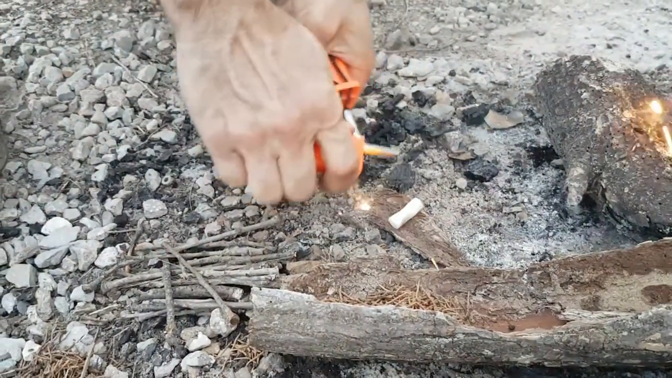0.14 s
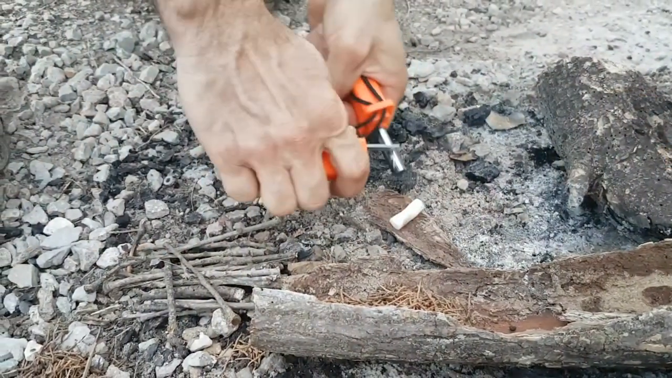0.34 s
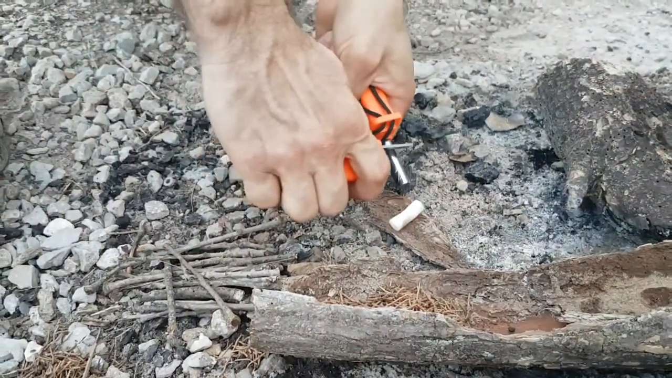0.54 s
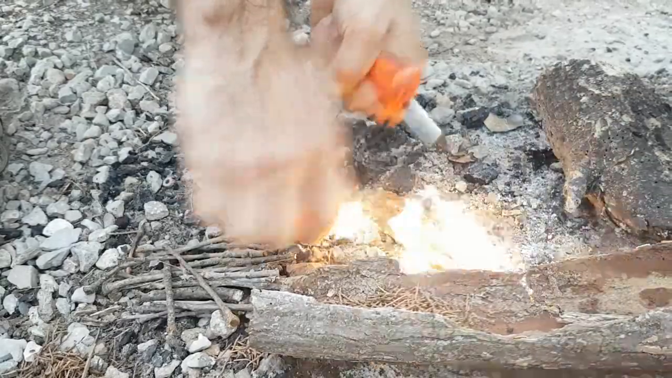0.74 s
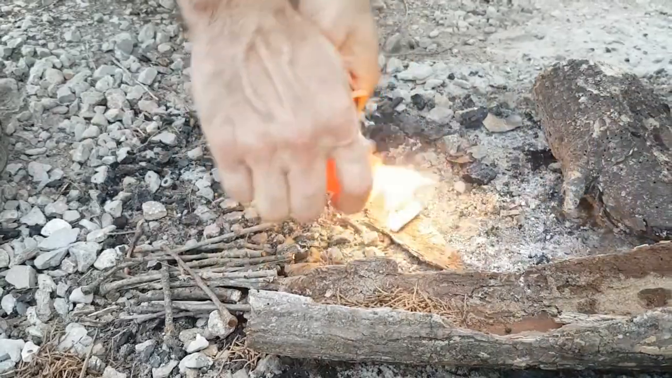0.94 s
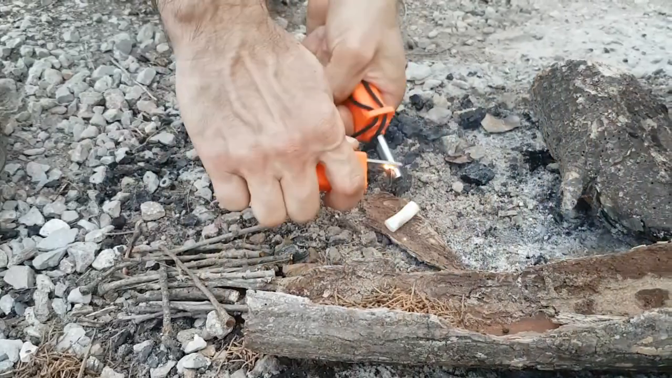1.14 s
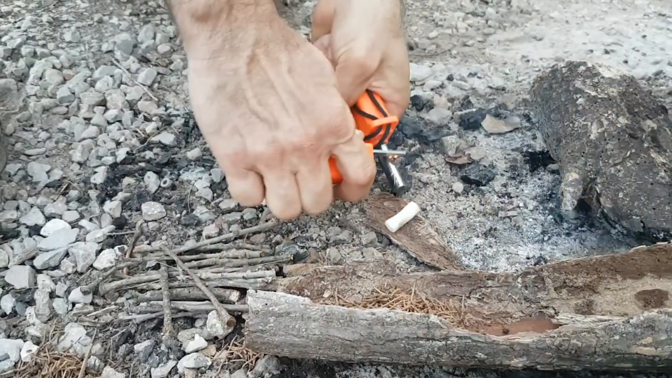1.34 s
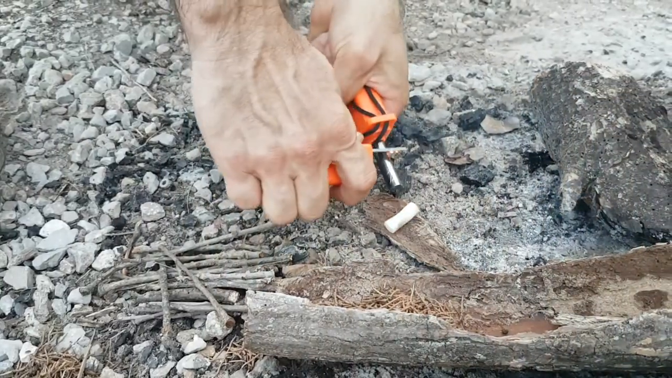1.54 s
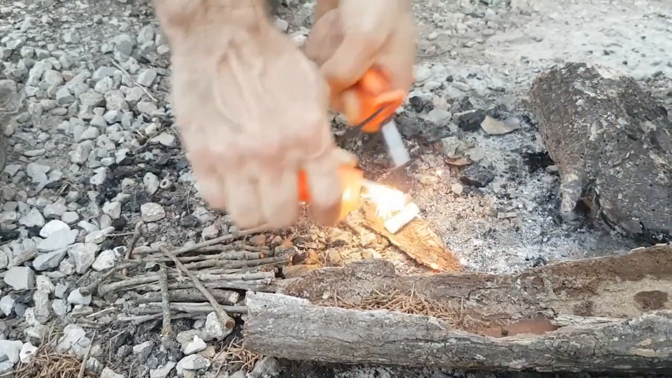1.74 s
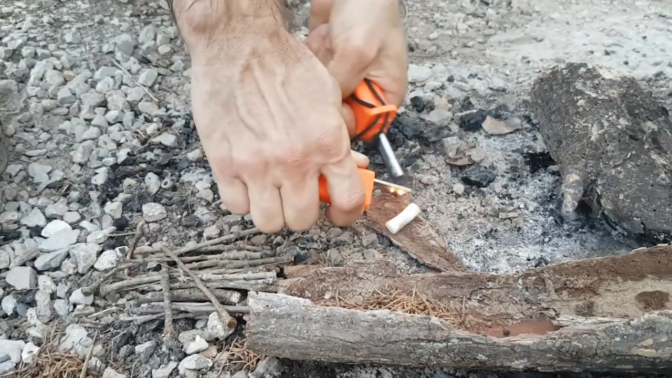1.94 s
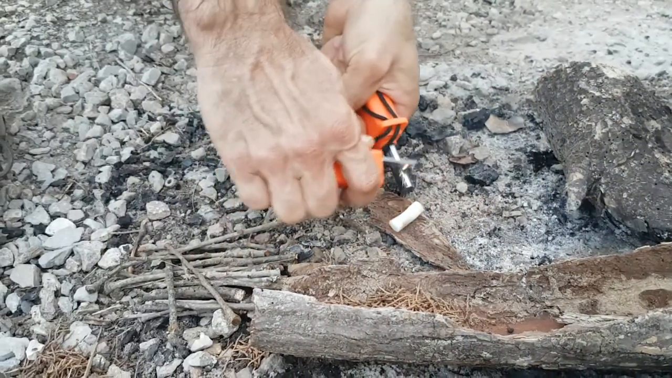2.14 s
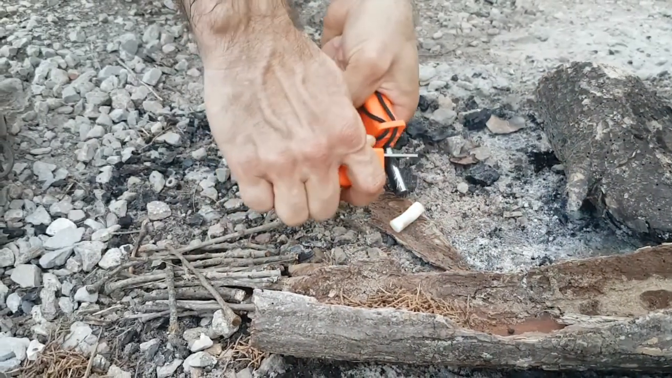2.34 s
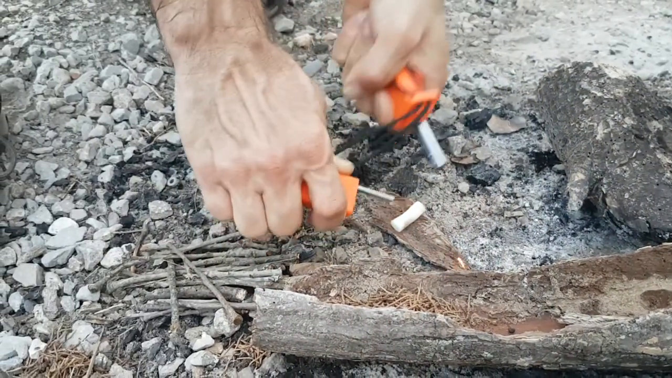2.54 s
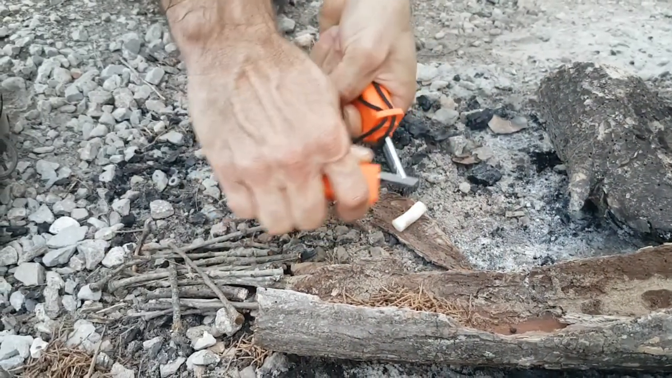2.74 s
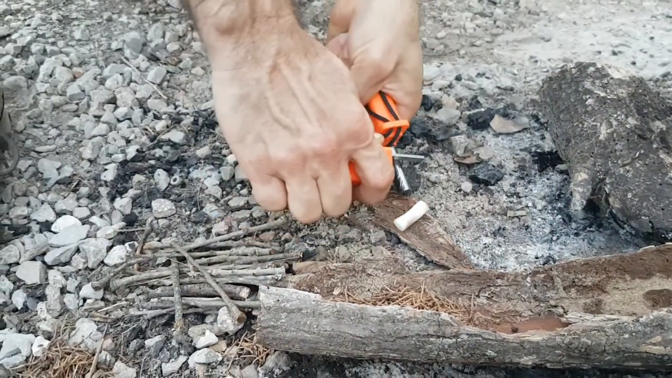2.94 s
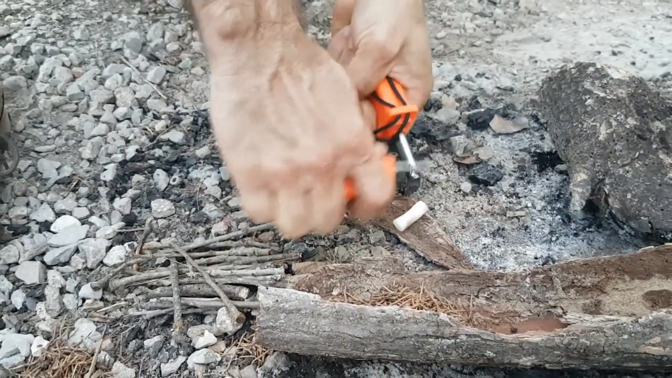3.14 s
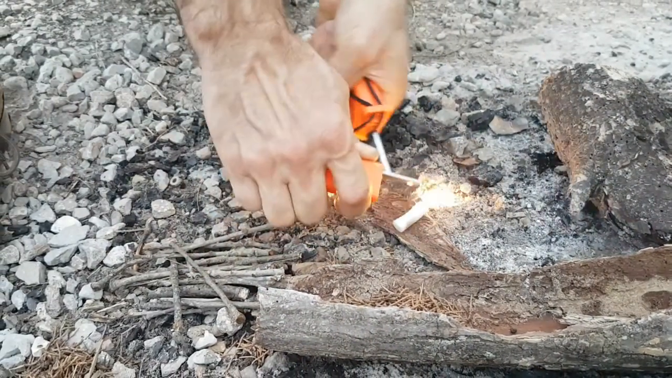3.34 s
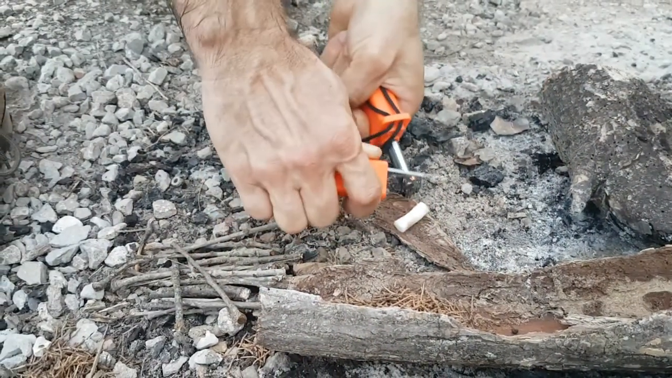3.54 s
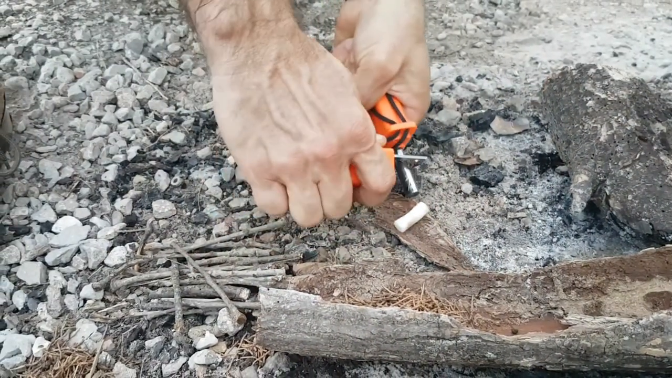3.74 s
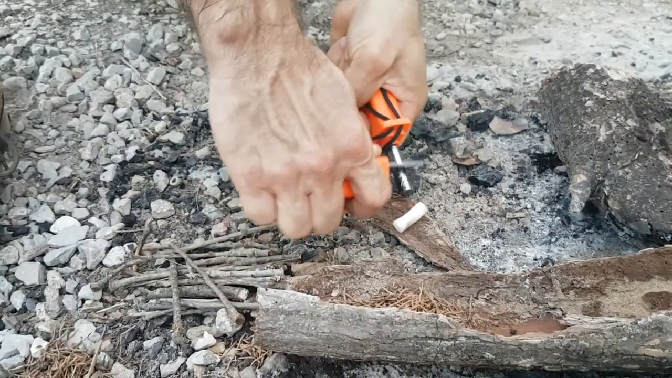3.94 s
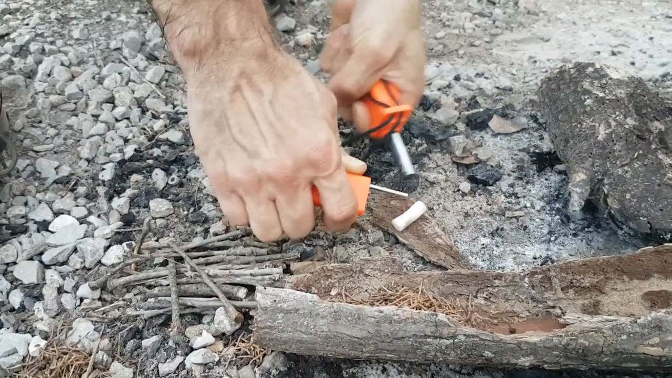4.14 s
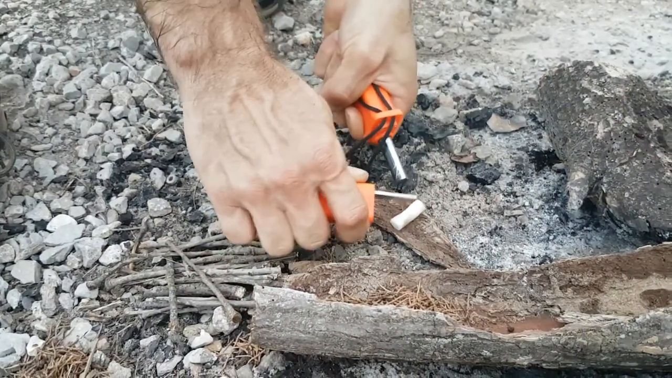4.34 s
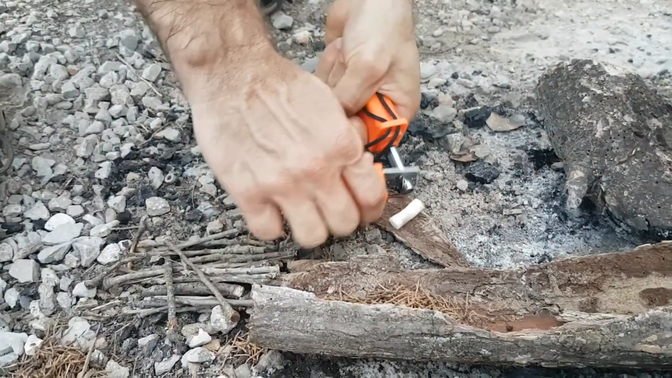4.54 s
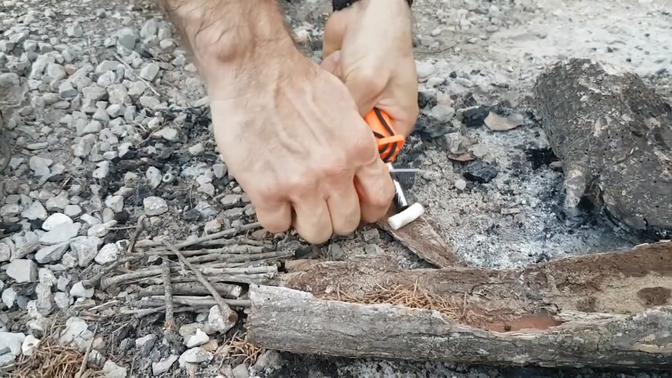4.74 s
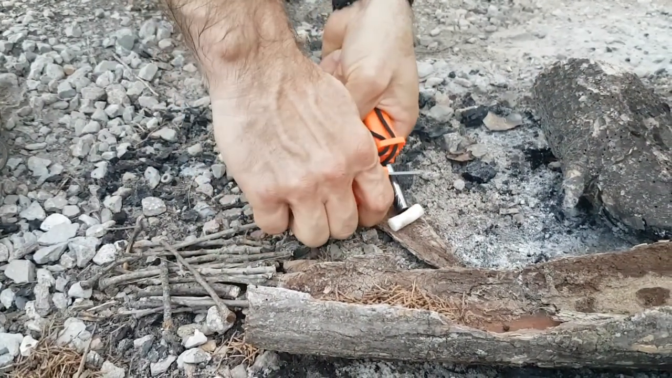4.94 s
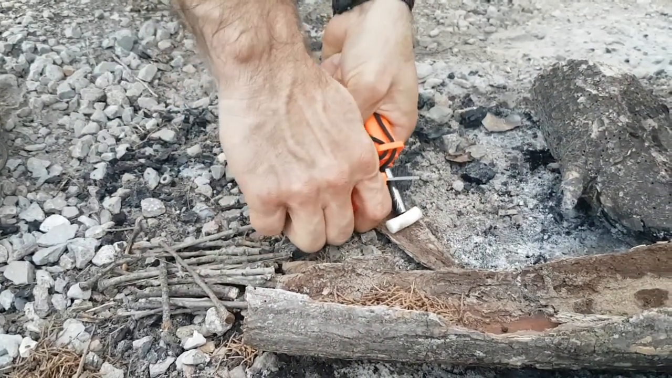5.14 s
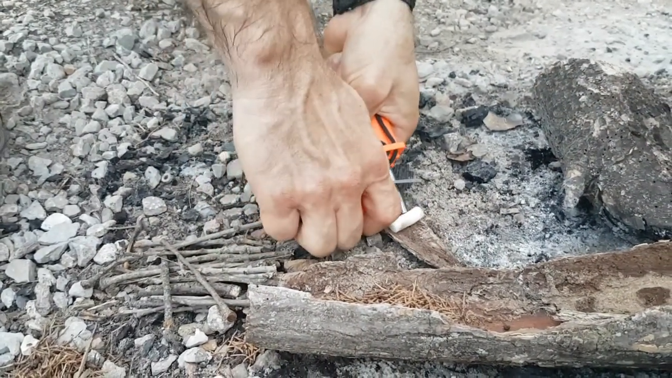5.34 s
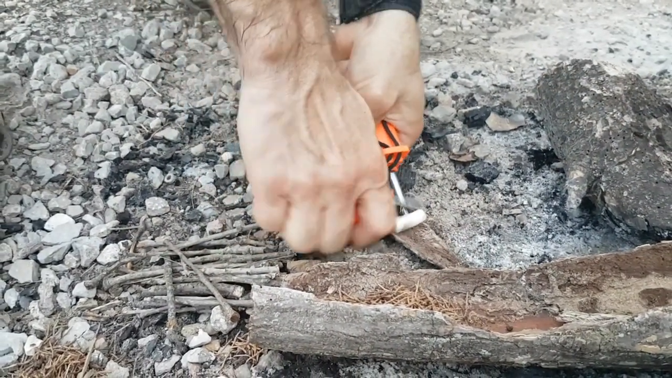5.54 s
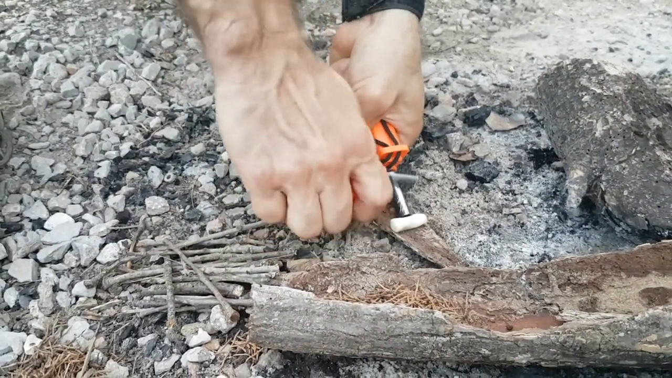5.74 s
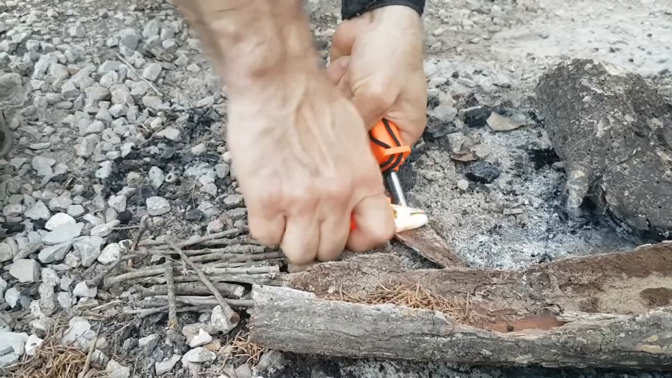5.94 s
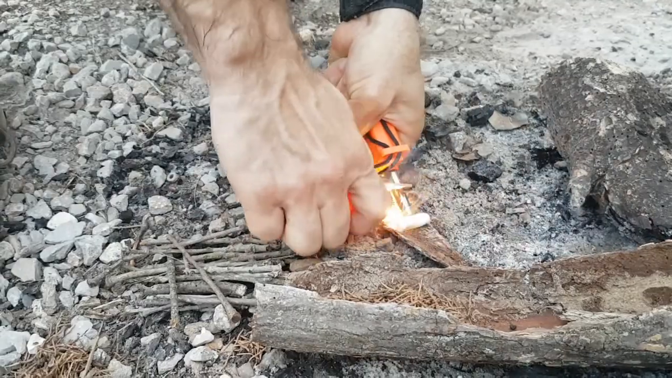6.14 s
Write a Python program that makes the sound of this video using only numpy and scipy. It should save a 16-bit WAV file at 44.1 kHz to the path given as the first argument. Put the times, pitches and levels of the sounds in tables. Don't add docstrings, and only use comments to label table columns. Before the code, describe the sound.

The tail of a spark burst crackles at 0 s with stirred grit, then crisp steel ticks at 0.3 and 0.45 s. Five fast scrapes follow at about 0.75, 1.6, 2.4, 3.2 and 4.0 s, each under a tenth of a second: a stick-slip metallic chatter ending in a hard bright snap, then fizzing shavings and rumbling grit. Sparks pop around 1.0 s; a very loud tick lands at 2.9 s. Faint rubs and touches fill 3.4-4.6 s. At 5.45-5.6 s ticks lead into a duller, pressed stuttering scrape with a snap and pop; another tick at 5.8, a weaker shove at 5.95, a loud clack at 6.16 s. Throughout, a distant engine idles low and pulsing, its upper tones receding, cicadas swell about once a second over a fast high throb, and a cricket holds steady. Thin whistles pass near 4.2 and 5.3 s. Close, dry, open air.

```python
import sys
import numpy as np
from scipy import signal
from scipy.fft import rfft, irfft
from scipy.io import wavfile

SR = 44100
rng = np.random.default_rng(int(sys.argv[2]) if len(sys.argv) > 2 else 0)


def inscribe(sig):
    pcm = np.round(np.clip(np.atleast_2d(sig).T, -1, 1) * 32767)
    wavfile.write(sys.argv[1], SR, pcm.astype(np.int16))


def magnitude_from_level(level_db):
    exponent = np.asarray(level_db, float) / 20
    return 10 ** exponent


N = 277389


def rms_one(x):
    return x / np.sqrt(np.mean(x ** 2) + 1e-20)


def in_time(rows):
    s, value = np.transpose(rows)
    return np.interp(np.arange(N) / SR, s, value)


def at_hz(points, hz):
    point_hz, value = np.transpose(points)
    return np.interp(np.log(hz), np.log(point_hz), value)


def drift(rate_hz):
    r = np.exp(-80 * np.pi * rate_hz / SR)
    slow = signal.lfilter([1], [1, -2 * r, r * r], rng.standard_normal(N // 40 + 2002))[2000:]
    return np.interp(np.arange(N) / 40, np.arange(len(slow)), rms_one(slow))


def peak(x, hz, width_hz):
    r = np.exp(-np.pi * width_hz / SR)
    feedback = [1, -2 * r * np.cos(2 * np.pi * hz / SR), r * r]
    return signal.lfilter(np.array([1, 0, -1]) * (1 - r * r) / 2, feedback, x)


def narrow(x, hz, width_hz):
    return rms_one(peak(peak(x, hz, width_hz), hz, width_hz))


def body(x, modes, spread_db=0, steep=False):
    out = 0
    for k, (hz, width_hz, db) in enumerate(modes):
        gain = (-1) ** k * magnitude_from_level(db + spread_db * rng.normal())
        if steep:
            ring = peak(peak(x, hz, 1.5 * width_hz), hz, 1.5 * width_hz)
        else:
            ring = peak(x, hz, width_hz)
        out = out + gain * ring
    return out


def coloured(x, spectrum):
    size = N + 499
    hz = np.maximum(np.fft.rfftfreq(size, 1 / SR), 1)
    return rms_one(irfft(rfft(x, size) * magnitude_from_level(at_hz(spectrum, hz)), size)[..., :N])


def grains(per_s, spread_db, hiss):
    sizes = magnitude_from_level(spread_db * np.minimum(rng.exponential(1, N), 4)) * rng.choice([-1, 1], N)
    return rms_one(sizes * (rng.random(N) < per_s / SR)) + hiss * rng.standard_normal(N)


def port_noise(common):
    return rng.standard_normal((2, N)) + common * rng.standard_normal(N)


def two_ports(x, other, pan_db, own=.55, lag=1):
    own = np.clip(own, 0, .7)
    shared = np.sqrt(1 - own ** 2)
    left = shared * x + own * other
    right = shared * np.roll(x, lag) - own * other
    return np.array([left * magnitude_from_level(pan_db / 2), right * magnitude_from_level(-pan_db / 2)])


def add(out, s, level_db, parts, pan_db):
    hit = sum(magnitude_from_level(db) * two_ports(*(p / np.abs(p[0]).max()), share * pan_db, own=0.35)
              for db, p, share in parts)
    i = round(s * SR)
    out[:, i:i + hit.shape[1]] += magnitude_from_level(level_db) * hit


def loudest(shapes):
    t = np.arange(N) / SR
    curves = [np.interp(t, np.maximum.accumulate(s), db, left=-120, right=-120) for s, db in shapes]
    return np.max(curves, axis=0)


def swell(s, rise, hold, fall, db):
    return [s - 2 * rise, s, s + hold, s + hold + 2 * fall], [db - 40, db, db, db - 40]


# (frequency [Hz], correlation [-1..1])
LIKENESS = [(60, 1), (130, 0.85), (290, 0.71), (640, 0.4), (1410, -0.7), (3100, -0.24), (6820, -0.17),
            (15000, -0.1)]


def wide_noise(spectrum):
    hz = np.maximum(np.fft.rfftfreq(N, 1 / SR), 1)
    alike = np.clip(at_hz(LIKENESS, hz), -.9, .99)
    mid, side = rfft(rng.standard_normal((2, N))) * magnitude_from_level(at_hz(spectrum, hz))
    return rms_one(irfft(np.sqrt(1 + alike) * mid + np.sqrt(1 - alike) * side * [[1], [-1]], N))


# (frequency [Hz], density [dB/Hz])
AIR = [(12, -42), (20, -35), (59, -7), (150, -2), (219, -5), (487, -17.5), (710, -16), (1110, -17),
       (1410, -24.5), (2870, -32), (4000, -45), (5200, -77), (8800, -120)]
# (frequency [Hz], density [dB/Hz])
HISS = [(3000, -33), (8000, 8), (9300, -37), (10300, -5), (11300, -1), (15300, 0.5), (15950, -2),
        (16300, -50)]
AIR_DB, HISS_DB = -34.5, -48


def air():
    rumble = magnitude_from_level(AIR_DB + 1.73 * drift(3.1)) * wide_noise(AIR)
    return rumble + magnitude_from_level(HISS_DB + 1.8 * drift(8)) * wide_noise(HISS)


# (multiple of half-order rate, level [dB])
EXHAUST_ORDERS = [(1, -31), (2, -43), (3, -93), (4, 0), (5, -45), (6, -45), (7, -10.5), (8, -1), (9, -2.5),
                  (10, -60), (11, -2), (12, -4), (13, -6), (14, -30), (15, -11.5), (16, -17.5), (17, -33),
                  (18, -32), (19, -22), (20, -21.5), (21, -24.5), (22, -31), (23, -32), (24, -18.5)]
# (time [s], level [dB])
BOOM = [(0.0, -33), (0.05, -35), (0.16, -34.5), (0.46, -33), (0.51, -37.5), (2.89, -31), (3.1, -33.5),
        (3.7, -31), (3.87, -36.5), (4.75, -30), (5.01, -44), (5.32, -32.5), (5.57, -31), (6.29, -46)]
IDLE_HZ, IDLE_SAG_HZ_PER_S = 18.02, 0.03
UPPER_DB, RECEDES_DB_PER_S = -31.5, 0.77


def exhaust():
    t = np.arange(N) / SR
    boom_db = in_time(BOOM) + 3.0
    upper_db = UPPER_DB - RECEDES_DB_PER_S * t
    turn = 2 * np.pi * (IDLE_HZ - IDLE_SAG_HZ_PER_S * t / 2) * t
    out = np.zeros(N)
    for k, db in EXHAUST_ORDERS:
        level_db = boom_db if k == 4 else upper_db + db + 0.63 + 1.17 * drift(1.3)
        lag = .12 * k * k
        out += magnitude_from_level(level_db) * np.sin(k * turn + lag + .4 * drift(2.0))
    return out


CASING_DB = -49.5


def casing():
    level_db = CASING_DB - RECEDES_DB_PER_S * np.arange(N) / SR
    return magnitude_from_level(level_db + 2.5 * drift(1.3)) * narrow(port_noise(0.27), 678, 194)


# (time [s], rise [s/20 dB], hold [s], fall [s/20 dB], level [dB])
WHINES = [
    (4.3, 3, 1.2, 1, -55),
    (5.69, 0, 0.095, 0, -44),
]


def whine_band():
    level_db = loudest([swell(*row) for row in WHINES]) + 3.1 * drift(0.84)
    return magnitude_from_level(level_db) * narrow(port_noise(0.27), 1733, 110)


def engine():
    return (exhaust() + casing() + whine_band()) * magnitude_from_level([[-.25], [.25]])


# (frequency [Hz], density [dB/Hz])
CHORUS = [(2600, -8), (3600, 3), (4500, -3), (6000, 2), (7500, 3), (8400, 1.5), (9200, -62.5)]
CHORUS_DB = -34.5


def chorus():
    return magnitude_from_level(CHORUS_DB + 1.3 * drift(20)) * wide_noise(CHORUS)


# (frequency [Hz], width [Hz], level [dB])
CICADA_MODES = [(4196, 340, 1), (5230, 520, 0.5), (5900, 446, 4.5), (6430, 536, 1.5), (8130, 450, -1)]
# (peak time [s], level [dB])
SWELLS = [
    (-0.3, -30),
    (0.91, -34.5),
    (2.01, -32.5),
    (3.35, -32),
    (4.66, -32),
    (5.05, -34.5),
    (6.13, -30),
]
SWELL_RISE_S, SWELL_FALL_S, SWELL_REST_DB = 0.93, 1.07, -41


def swelling_cicada():
    swells_db = loudest([swell(s, SWELL_RISE_S, 0, SWELL_FALL_S, db) for s, db in SWELLS])
    level_db = np.maximum(swells_db, SWELL_REST_DB) + 2.5 + 1.0 * drift(35)
    return magnitude_from_level(level_db) * rms_one(body(port_noise(0.57), CICADA_MODES))


THROB_DB, THROB_RATE_HZ, DRUM_HZ = -39.5, 38.1, (7240, 7390)


def throbbing_cicada():
    t = np.arange(N) / SR
    beat = np.cos(2 * np.pi * THROB_RATE_HZ * t + .2 * drift(1.5))
    drums = 0.27 * narrow(port_noise(0.57), 7470, 400)
    for hz in DRUM_HZ:
        jitter = 1.35 * drift(80) + .6 * np.array([drift(40), drift(40)])
        drums = drums + np.sin(2 * np.pi * hz * t + jitter)
    gate = .08 + np.tanh(1.5 * (beat + .35)).clip(0)
    return magnitude_from_level(THROB_DB + 0.47 * drift(1.2)) * rms_one(gate * drums)


CRICKET_DB, CRICKET_HZ = -46, 5100


def cricket():
    return magnitude_from_level(CRICKET_DB) * narrow(port_noise(0.57), CRICKET_HZ, 83)


# (time [s], peak [dB], centre [Hz], length [s])
POPS = [(0.0095, -10.5, 7000, .0012), (0.016, -13, 12000, .0012), (0.07, -19, 6000, .0015),
        (0.147, -31, 13500, .0015), (0.845, -32, 13000, .002), (0.864, -27, 12000, .001),
        (0.9265, -27, 12900, .001), (1.001, -20, 6000, .001), (1.014, -18, 6000, .0008),
        (1.042, -25, 9000, .0015), (1.054, -29, 6500, .002), (1.7075, -24, 13000, .001),
        (3.2375, -26, 11000, .0015), (3.297, -30, 11000, .001), (5.487, -22, 13500, .001),
        (5.516, -28, 13500, .001), (5.5225, -15, 13000, .001), (5.591, -10.5, 14200, 0.0012),
        (5.631, -28, 12000, .001), (5.995, -27, 13500, .002), (6.006, -25, 14500, .003),
        (6.084, -30, 13500, .002)]


def pops():
    out, t = np.zeros((2, N)), np.arange(600) / SR
    for s, level_db, hz, length_s in POPS:
        envelope = (1 - np.exp(-t / .0002)) * np.exp(-t / max(length_s, .0003))
        burst = rng.standard_normal((2, len(t))) * envelope
        bright, dull = narrow(burst, hz, 0.36 * hz), narrow(burst, 2200, 2500)
        add(out, s, level_db, [(3, bright, 1), (-14, dull, 0)], -2.0)
    return out


# (frequency [Hz], width [Hz], level [dB])
ROD = [(3126, 285, 2.5), (4137, 193, 0), (4950, 550, -2), (6300, 310, 1.5), (7600, 570, 0)]
# (frequency [Hz], width [Hz], level [dB])
KNOCK = [(763, 90, 5), (1330, 790, 2.5), (2230, 6700, -13)]


def strike(contact, hz, knock_db, edge_db, spot):
    high_pass = signal.butter(4, 9000, "high", fs=SR, output="sos")
    modes = [(f, w, db + more) for (f, w, db), more in zip(ROD, spot)]
    steel = peak(magnitude_from_level(-12) * peak(contact, hz, 1700) + body(contact, modes), 4800, 7300)
    knock = peak(body(contact, KNOCK, spread_db=4.5), 910, 3600)
    edge = signal.sosfilt(high_pass, contact)
    return [(0, steel, 1), (knock_db, knock, 0), (edge_db, edge, .4)]


def stone_scatter(t):
    return magnitude_from_level(-22.5) * np.exp(-t / 0.0053)


# (time [s], peak [dB], ring [Hz], knock [dB rel], edge [dB rel])
TICKS = [
    (0.3284, 2, 4500, -17, 0),
    (0.4529, 0, 6000, -16.5, -41),
    (2.9119, 7, 6300, -17, -9),
    (5.4486, -2, 5600, -10.5, 3.5),
    (5.7812, 1.5, 5600, -13.5, -33),
    (6.1592, 6.5, 4640, -17, -4),
]
# (clack [dB], mode 1 [dB], mode 2 [dB], mode 3 [dB], mode 4 [dB])
TICK_SPOTS = [(-3.5, 4, -2, -7, -4.5), (-4, 0.5, -10, 0, -13), (-9.5, 0.5, -3.5, 1, -12.5),
              (-13, -2, -3, 0, -6), (-9.5, 2, -0.5, 1, -26), (-13, 3.5, -1, -4, -3)]
# (time [s], peak [dB], ring [Hz],
# knock [dB rel], edge [dB rel])
GLANCES = [(0.015, -12, 7600, -2.5, 17), (0.9826, -19, 5070, -4, 6), (1.0217, -13.5, 6100, -12, -7),
           (1.6801, -12, 4300, 0.5, 15), (1.68, -10.5, 4300, 4, 14), (5.489, -14, 4600, -0.5, 4),
           (1.845, -25, 7500, -18, 8), (1.762, -21, 7240, -5, 0), (1.791, -13.5, 7260, -10, -4),
           (5.4843, -16, 4330, -5, -23), (5.5224, -20, 4280, -14, -2)]
# (clack [dB], mode 1 [dB], mode 2 [dB], mode 3 [dB], mode 4 [dB])
GLANCE_SPOT = (-22, -7, -12, -4, -11)


def ticks():
    out, t = np.zeros((2, N)), np.arange(2000) / SR
    spots = TICK_SPOTS + [GLANCE_SPOT] * len(GLANCES)
    for (s, level_db, hz, knock_db, edge_db), spot in zip(TICKS + GLANCES, spots):
        envelope = .07 * np.exp(-t / .001) + .6 * stone_scatter(t)
        contact = rng.standard_normal((2, len(t))) * envelope
        contact[:, 4] += [1, .5]
        add(out, s - .0002, level_db, strike(contact, hz, knock_db, edge_db, spot), -2.5)
    return out


# (bite [s], run-up [s], tip reached [s], chatter [dB], last tear [dB])
PULLS = [
    (0.737, 0.012, 0.7695, -22.5, -20.5),
    (1.601, 0.014, 1.6605, -22, -17.5),
    (2.41, 0.0046, 2.4725, -20, -19.5),
    (3.16, 0.036, 3.206, -21, -19.5),
    (3.976, 0.026, 4.041, -21, -17.5),
]
RUN_UP_DB, SAG_DB, TEAR_S, LIFT_S = 20, 3.5, 0.023, 0.0027


def pulls(below_db, below_tear_db, slack_db, sag_db=SAG_DB):
    shapes = []
    for s, run_s, tip, db, tear_db in PULLS:
        times = [s - run_s, s, tip - TEAR_S, tip - 1.05 * TEAR_S, tip, tip + LIFT_S / 2, tip + LIFT_S]
        drag_db = db + below_db - np.array([RUN_UP_DB, 0, sag_db])
        end_db = tear_db + below_tear_db - np.array([slack_db, 0, 0, 20])
        shapes.append((times, [*drag_db, *end_db]))
    return shapes


# (frequency [Hz], density [dB/Hz])
FIZZ = [(1470, -49), (2500, -7.5), (2990, -3), (5990, 0.5), (9800, -6), (14600, -3), (15900, -10),
        (16200, -30)]
# (frequency [Hz], density [dB/Hz])
GRIT = [(250, -1), (450, 3.5), (900, 1), (1500, -2.5), (2600, -5.5), (4000, -50)]
# (time [s], hold [s], fall [s/20 dB], fizz [dB], grit [dB])
SHOWERS = [
    (0.791, 0.023, 0.05, -30.5, -23.5),
    (1.658, 0.01, 0.1, -29, -20),
    (2.486, 0.013, -0.12, -37.5, -29),
    (3.203, 0.052, 0.14, -39, -40),
    (5.518, 0.002, 0.2, -46, -33.5),
    (5.932, 0.037, 0, -35.5, -32.5),
    (5.992, 0.12, 0.15, -40, -33.5),
    (6.167, 0.003, -0.1, -42, -26),
]
# (time [s], rise [s/20 dB], fall [s/20 dB], fizz [dB], grit [dB])
STIRS = [(0.016, 0.04, 0.018, -29, -24), (0.076, 0.12, 0.09, -40, -29), (0.148, 0.02, 0.04, -52, -35),
         (0.72, 0.1, 0.1, -60, -36), (0.845, 0.03, 0.07, -40, -35), (0.884, 0.03, 0.04, -37, -31),
         (0.926, 0.07, 0.02, -43, -38), (0.984, 0.012, 0.06, -32, -32), (1.022, 0.03, 0.025, -39, -31),
         (1.055, 0.07, 0.022, -39, -33), (1.68, 0.012, 0.03, -26, -19), (5.608, 0.08, 0.012, -34, -27),
         (1.796, 0.12, 0.07, -36, -32.5), (3.22, 0.12, 0.19, -47, -27), (6.075, 0.17, 0.05, -39, -28),
         (3.4, 0.02, 0.02, -48, -32.5), (3.687, 0.1, 0.1, -53, -34.5), (4.435, 0.04, 0.04, -65, -36),
         (4.66, 0.6, 0.4, -65, -41), (5.499, 0.16, 0.02, -46, -33), (5.77, 1.5, 0.2, -65, -38.5)]
SHAVING_DB, SHAVING_TEAR_DB, DUST_DB, DUST_TEAR_DB = -17.5, -11, -15, -10
FLARE_S, GRIT_LINGERS = 0.009, 0.99


def sparks():
    fizz_shapes = pulls(SHAVING_DB, SHAVING_TEAR_DB, 5.4, sag_db=-6.0)
    grit_shapes = pulls(DUST_DB, DUST_TEAR_DB, 9.3)
    for s, hold, fall, fizz_db, grit_db in SHOWERS:
        fizz_shapes.append(swell(s, FLARE_S, hold, fall, fizz_db))
        grit_shapes.append(swell(s, FLARE_S, hold, GRIT_LINGERS * fall, grit_db))
    for s, rise, fall, fizz_db, grit_db in STIRS:
        fizz_shapes.append(swell(s, rise, 0, fall, fizz_db))
        grit_shapes.append(swell(s, rise, 0, fall, grit_db))
    fizz = [coloured(grains(2200, 2.3, 1.0), FIZZ) * magnitude_from_level(1.4 * drift(70)) for _ in range(2)]
    grit = [coloured(grains(600, 1.8, 0.5), GRIT) * magnitude_from_level(1.2 * drift(57)) for _ in range(2)]
    out = magnitude_from_level(loudest(fizz_shapes) + 8.5) * two_ports(*fizz, -1.3, own=1.0, lag=0)
    return out + magnitude_from_level(loudest(grit_shapes) - 2.0) * two_ports(*grit, 0.94, own=0.26)


# (time [s], peak [dB], ring [Hz], length [s], bright [dB rel])
TOUCHES = [(0.072, -23, 1640, 0.011, 5.5), (0.38, -19, 3250, 0.0018, 0), (0.388, -25.5, 4000, 0.0064, 4),
           (0.705, -29, 1400, 0.0048, 7), (0.885, -25, 1670, 0.0022, 0), (0.945, -20, 1570, 0.0061, -24),
           (1.22, -22, 1300, 0.0027, 5), (1.307, -24, 3460, 0.0053, -15), (2.213, -16, 3400, 0.00077, 3),
           (3.402, -32, 3250, 0.003, -3), (3.578, -23, 3080, 0.0055, -10), (3.594, -29.5, 3200, 0.034, -12),
           (3.639, -30, 3250, 0.044, -11.5), (3.669, -21, 3250, 0.019, -5), (4.448, -28, 2190, 0.0063, 0),
           (4.586, -24.5, 1520, 0.0051, 0), (4.587, -24, 3230, 0.0084, 1), (4.611, -27.5, 1520, 0.0034, 0),
           (6.066, -23, 1410, 0.01, 4)]


def touches():
    out, t = np.zeros((2, N)), np.arange(2000) / SR
    for s, level_db, hz, length_s, bright_db in TOUCHES:
        envelope = (1 - np.exp(-t / 0.00021)) * np.exp(-t / max(length_s, .0003))
        rub = rng.standard_normal((2, len(t))) * envelope
        dull = narrow(rub, hz, 730) + 0.94 * narrow(rub, 910, 3000)
        bright = narrow(rub, 3850, 3100)
        add(out, s - .0004, level_db + 2.0, [(0, dull, 0), (bright_db, bright, 1)], -1.5)
    return out


# (frequency [Hz], width [Hz], level [dB])
FREE_ROD = [(4170, 300, 1), (4640, 300, 2), (6420, 220, -5.5), (7900, 160, -12), (10500, 210, -13.5)]
# (frequency [Hz], width [Hz], level [dB])
SHORT_ROD = [(4300, 560, -3.5), (5280, 450, -1), (6340, 330, -7), (7280, 160, -9.5), (11000, 950, -9.5)]


def rod_ring(x, near_tip):
    low_cut = signal.butter(4, 3500, "high", fs=SR, output="sos")
    free = np.sqrt(1 - near_tip) * body(x, FREE_ROD, steep=True)
    short = np.sqrt(near_tip) * body(x, SHORT_ROD, steep=True)
    return signal.sosfilt(low_cut, free + short)


# (frequency [Hz], width [Hz], level [dB])
PRESSED_ROD = [(4090, 550, -0.5), (4730, 650, -1), (6700, 500, -13)]


def pressed_ring(x):
    return sum((-1) ** k * magnitude_from_level(db) * narrow(x, hz, w) for k, (hz, w, db) in enumerate(PRESSED_ROD))


# (time [s], rise [s/20 dB], hold [s], chatter [dB], handle [dB rel])
RUBS = [(0.707, 0.06, 0.025, -38, -7), (1.305, 0.05, 0.03, -38, -10), (5.488, 0.025, 0.07, -25.5, -6.5),
        (5.598, 0.0243, 0.002, -16, -5), (5.784, 0.002, 0.017, -28, -10), (5.926, 0.012, 0.012, -19.5, -19),
        (5.578, 0.006, 0.012, -20.5, -14), (5.95, 0.06, 0.018, -24, -12), (5.958, 0.01, 0.013, -29, 2),
        (5.975, 0.01, 0.022, -42, 8), (6.162, 0.002, 0.019, -24, -19)]
HANDLE_DB, HANDLE_TEAR_DB = -19, -17.5
SLACK_DB, RUB_FALL_S, PRESSED_FROM_S = 4, 0.014, 5


def chatter():
    rod_shapes = pulls(0, 0, SLACK_DB)
    handle_shapes = pulls(HANDLE_DB, HANDLE_TEAR_DB, 5.6)
    for s, rise, hold, db, handle_rel_db in RUBS:
        rod_shapes.append(swell(s, rise, hold, RUB_FALL_S, db))
        handle_shapes.append(swell(s, rise, hold, 1.6 * RUB_FALL_S, db + handle_rel_db))
    glide = [(-TEAR_S - .008, 0), (-TEAR_S, 1), (2 * LIFT_S, 1), (2 * LIFT_S + .002, 0)]
    near_tip = in_time([(tip + s, share) for _, _, tip, _, _ in PULLS for s, share in glide])
    is_free = np.arange(N) < PRESSED_FROM_S * SR
    rod, handle = [], []
    for _ in range(2):
        slips = grains(2500, 1.5, 1.0) * magnitude_from_level(1.5 * drift(170))
        rod.append(np.where(is_free, rms_one(rod_ring(slips, near_tip)), rms_one(pressed_ring(slips))))
        handle.append(narrow(slips, 1300, 310))
    out = magnitude_from_level(loudest(rod_shapes) + 1.0) * two_ports(*rod, -4.0, own=0.11)
    return out + magnitude_from_level(loudest(handle_shapes) + 1.0) * two_ports(*handle, .6, own=0.5)


# (time [s], peak [dB], near the tip [0-1])
SLIPS = [(0.737, -13, 0), (.741, -11, 0), (.761, -14, 0.9), (.7655, -13, 1), (1.602, -13, 0),
         (1.6084, -8, 0), (1.658, -3.5, 0.6), (2.4118, -6.5, 0.1), (2.429, -9, 0.1), (2.4648, -9, .5),
         (3.1585, -22, 0.1), (3.163, -11, 0), (3.171, -12, 0.1), (3.975, -14, 0.1), (3.9832, -11, 0),
         (3.149, -17, 0), (3.9625, -25, 0.1), (4.0215, -10, 1), (4.033, -10, 1), (5.51, -21, 0),
         (5.531, -15, .3), (5.545, -22, .3), (5.579, -12, .3), (5.5855, -9, .3), (5.5883, -8, 0),
         (5.5933, -4, 0), (5.5955, -9, 0), (5.927, -12, 0), (5.931, -6, 0.06), (6.179, -16, 0.6)]


def hard_slips():
    out, t = np.zeros((2, N)), np.arange(600) / SR
    for s, level_db, near_tip in SLIPS:
        slip = rng.standard_normal((2, len(t))) * np.exp(-((t - .0005) / .0004) ** 2)
        ring = rod_ring(slip, near_tip) if s < PRESSED_FROM_S else pressed_ring(slip)
        add(out, s - .0008, level_db, [(0, ring, 1)], -5.0)
    return out


# (time [s], peak [dB], ring [Hz], thud [dB rel], edge [dB rel])
SNAPS = [
    (0.772, -1, 3930, -27, -24),
    (0.777, 6, 4350, -31, -29),
    (1.6606, 0.5, 5830, -13, -15),
    (2.4722, 3.5, 5900, -13, -15),
    (3.207, 3, 6070, -9.5, -19),
    (4.0401, 2, 5140, -9.5, -9),
    (5.598, 0.5, 4340, -31, -31),
    (5.967, -5.5, 4640, -11, -24),
]
# (clack [dB], mode 1 [dB], mode 2 [dB], mode 3 [dB], mode 4 [dB])
SNAP_SPOTS = [(-10, 8, -8, -18, -14), (-3.5, 1, 1, -14, -25), (0, -2, -1, -1, -9),
              (-12.5, -17, -1.5, 0.5, -20), (3, -8.5, -2, 1, -13), (-5.5, -2, 1, -4.5, -12),
              (-12, 2, -4, -26, -20), (-21, -1, 4, -7, -16)]
# (frequency [Hz], width [Hz], level [dB])
THUD = [(568, 44, -3.5), (838, 77, 0), (1048, 65, -1.5), (1300, 66, -3.5)]
SNAP_KNOCK_DB = -18


def snaps():
    out, t = np.zeros((2, N)), np.arange(2000) / SR
    for (s, level_db, hz, thud_db, edge_db), spot in zip(SNAPS, SNAP_SPOTS):
        tear = magnitude_from_level(-12) * (1 - np.exp(-t / .0004)) * np.exp(-(t / .0022) ** 2)
        contact = rng.standard_normal((2, len(t))) * (tear + stone_scatter(t))
        contact[0, round(.0008 * SR)] += .8
        add(out, s - .0006, level_db, strike(contact, hz, SNAP_KNOCK_DB, edge_db, spot), -4.5)
        jolt = np.exp(-((t - .0004) / 0.00011) ** 2) * [[1], [.3]]
        add(out, s, level_db + thud_db, [(0, body(jolt, THUD, spread_db=3.5), 0.72)], 1.0)
    return out


# (time [s], hold [s], level [dB])
WHISTLES = [
    (4.166, 0.17, -47.5),
    (5.278, 0.1, -46.5),
]
# (frequency [Hz], level [dB])
WHISTLE_LINES = [(3300, 6), (3660, 2.5), (5110, 6.5), (5486, 7.5)]
WHISTLE_RISE_S, WHISTLE_FALL_S = 0.09, 0.08


def whistles():
    t = np.arange(N) / SR
    level_db = loudest([swell(s, WHISTLE_RISE_S, hold, WHISTLE_FALL_S, db) for s, hold, db in WHISTLES])
    out = np.zeros((2, N))
    for hz, db in WHISTLE_LINES:
        waver = 1.4 * np.array([drift(7.5), drift(8.2)])
        out += magnitude_from_level(level_db + db + 2.0 * drift(8.8)) * np.sin(2 * np.pi * hz * t + waver)
    return out


def scene():
    insects = chorus() + swelling_cicada() + throbbing_cicada() + cricket() + whistles()
    around = air() + engine() + insects * magnitude_from_level([[-1.2], [1.2]])
    steel = ticks() + touches() + chatter() + hard_slips() + snaps()
    return around + steel + pops() + sparks()


def roll_off(x):
    return signal.sosfilt(signal.butter(12, 15880, fs=SR, output="sos"), x)


def record(dry):
    return roll_off(np.clip(dry - .0037, -1, 1))


dry = scene()
out = record(dry)
inscribe(out)
```